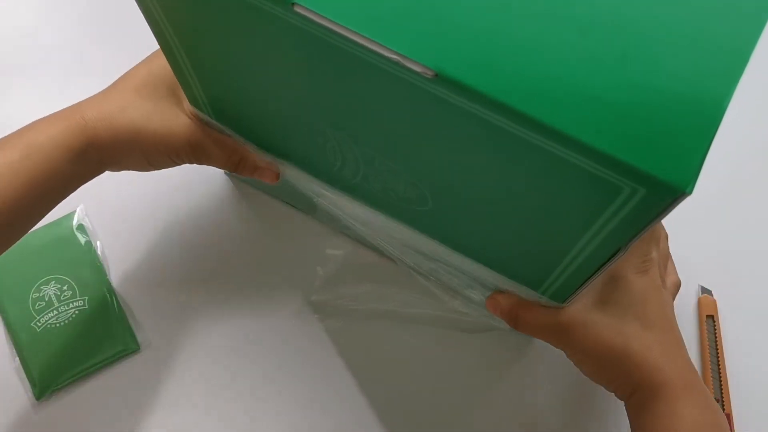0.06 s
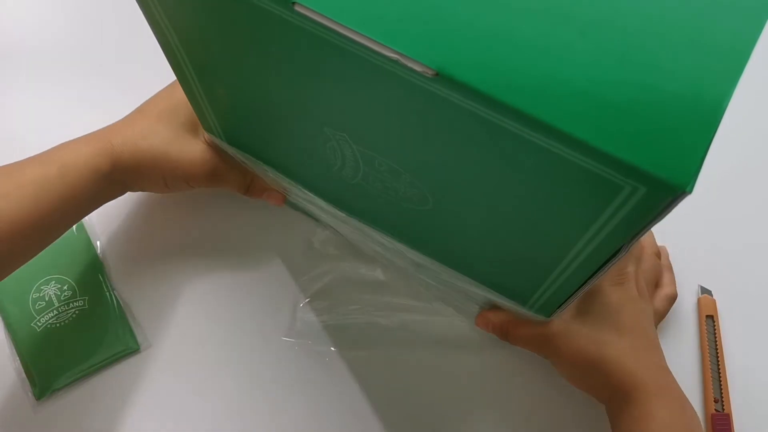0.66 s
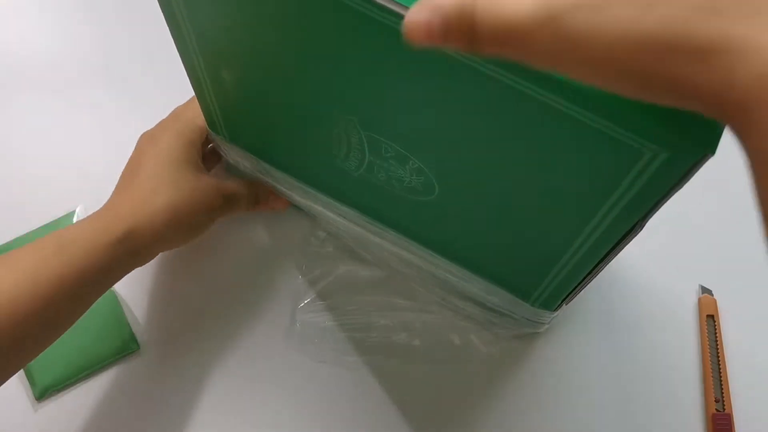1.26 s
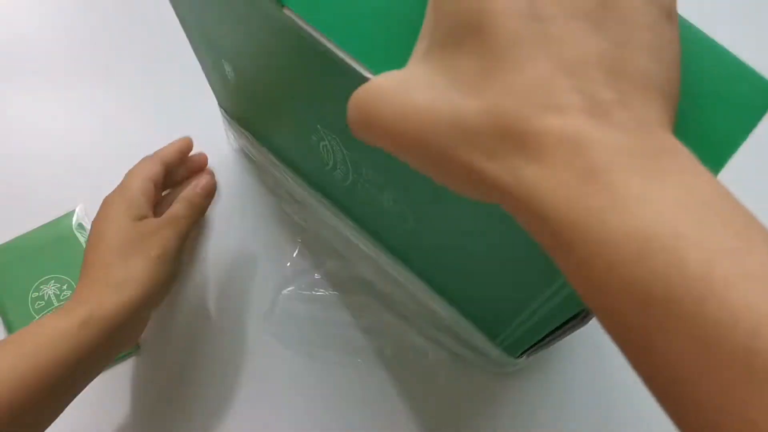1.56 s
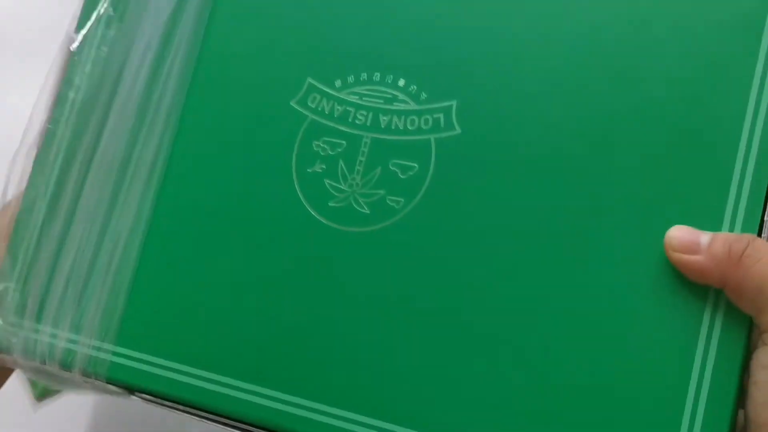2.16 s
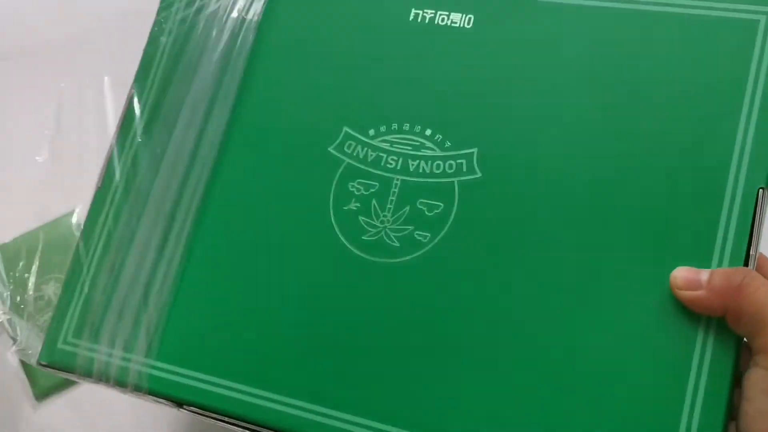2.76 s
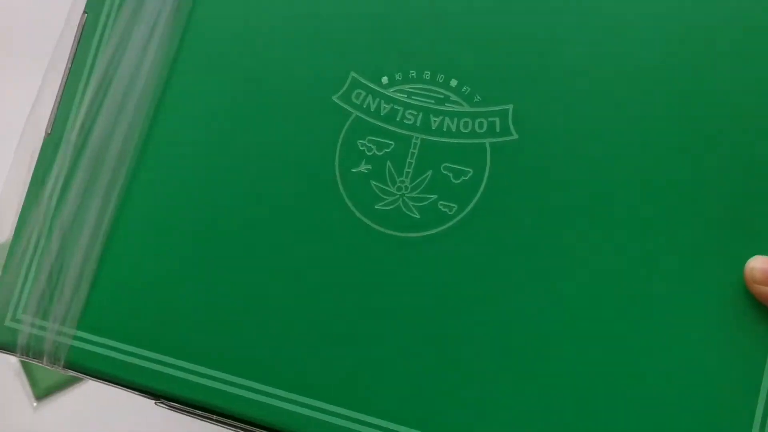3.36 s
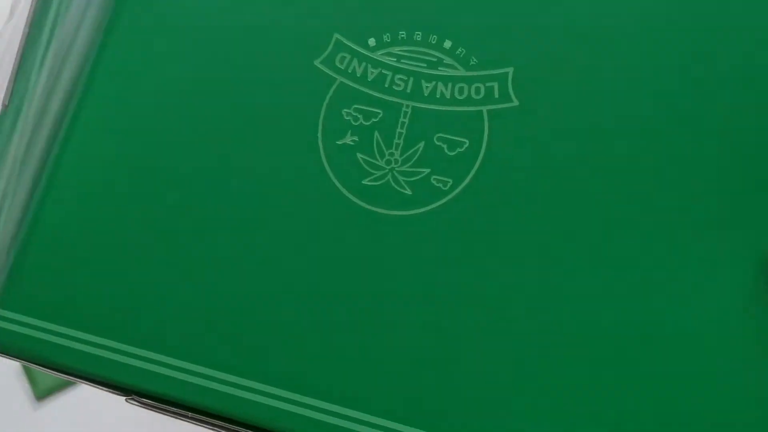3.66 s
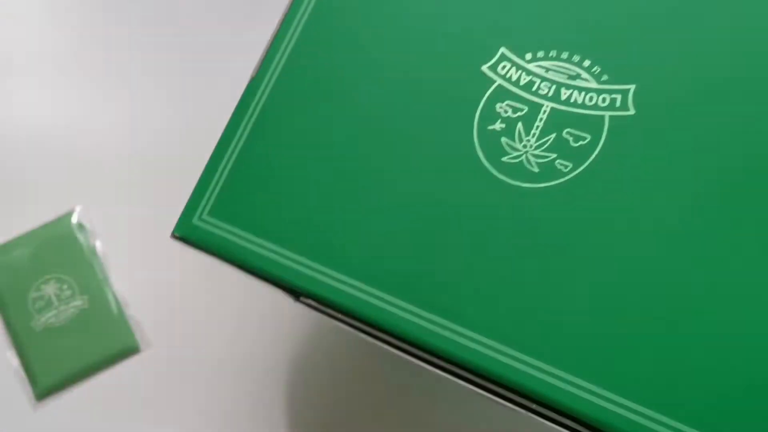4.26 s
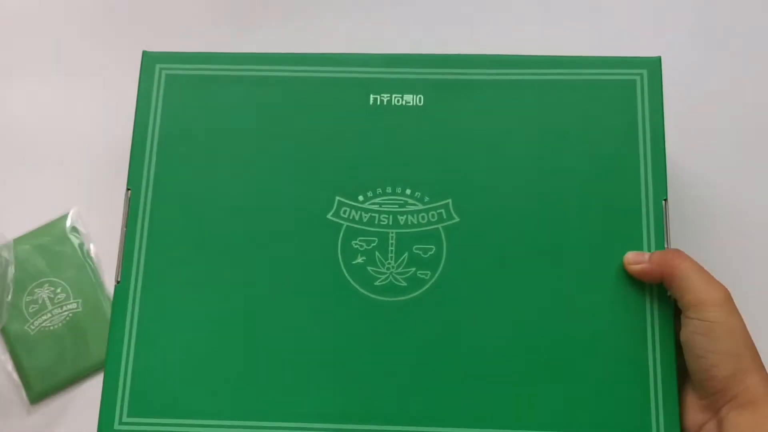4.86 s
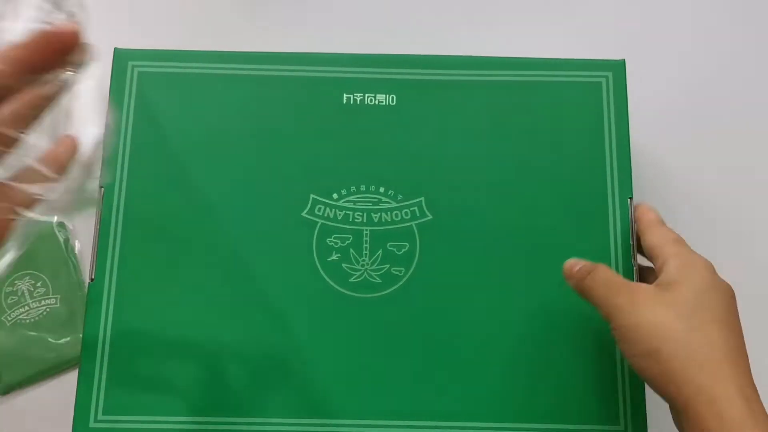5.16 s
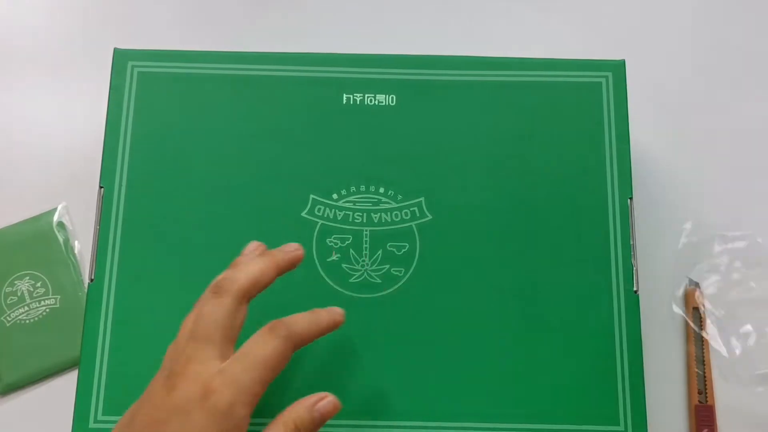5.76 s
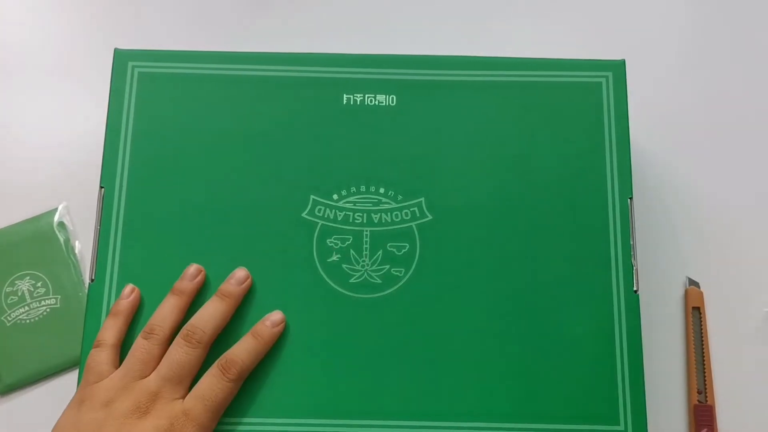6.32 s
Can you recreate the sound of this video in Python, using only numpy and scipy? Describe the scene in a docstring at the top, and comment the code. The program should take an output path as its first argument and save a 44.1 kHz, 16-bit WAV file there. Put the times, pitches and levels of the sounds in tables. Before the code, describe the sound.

Thin plastic wrap hisses softly in uneven strokes as it slides off a large cardboard box, with sharper rustles and tiny snaps when it is tugged. Fingers tap and rub the hollow lid. After one loud tug, the box lands on a table in two low thumps, clacking and scraping, and the loose wrap rustles aside. The sound is close, in a small quiet room with a faint hum.

```python
"""Unwrapping a cardboard box

Close by in a small room, a sleeve of plastic wrap is worked off a large box. The film hisses as it
sticks and slips over the card, rustles when tugged and snaps at its creases. Fingers tap and rub the
hollow lid. The box lands on a table in two thumps, its contents clack, its shell scrapes, and the
loose wrap is swept aside. Still air and a faint hum lie underneath."""
import sys
import numpy as np
from scipy import signal
from scipy.fft import rfft, irfft, next_fast_len
from scipy.io import wavfile
from scipy.ndimage import uniform_filter1d

SR = 44100
rng = np.random.default_rng(int(sys.argv[2]) if len(sys.argv) > 2 else 0)


def transcribe(signal):
    """Save signal, clipped to [-1, 1], as a 16-bit WAV file at the path in sys.argv[1]."""
    frames = np.atleast_2d(signal).T
    limited = np.clip(frames, -1, 1)
    pcm = np.round(limited * 32767).astype(np.int16)
    wavfile.write(sys.argv[1], SR, pcm)


N = 286209
TIME = np.arange(N) / SR
AGE = np.arange(SR // 2) / SR   # seconds since a hit

# strokes of film over card: (fastest moment [s], level [dB], rise [s], fall [s], brightness [dB])
FILM_STROKES = [(0.161, -48, 0.2, 0.13, 3.5), (0.44, -53, 0.13, 0.096, 2), (0.76, -49.5, 0.22, 0.17, 0.5),
                (1.16, -64, 0.17, 0.073, 1.5), (1.61, -48.5, 0.039, 0.03, -2.5),
                (1.808, -54, 0.23, 0.15, -4.5), (2.1, -60, 0.025, .1, -12),
                (2.28, -49.5, 0.04, 0.065, -0.5), (2.6, -49, 0.28, 0.24, -1.5), (3.02, -56, 0.2, 0.27, 0.5),
                (3.35, -46.5, .05, 0.05, -3), (3.68, -49.5, 0.16, 0.3, 1.5), (3.921, -39, 0.078, 0.087, -2),
                (4.19, -49.5, 0.049, .07, -1), (4.35, -58, 0.082, 0.084, -2), (5.02, -51, 0.21, .17, -4.5),
                (5.36, -45.5, 0.21, 0.12, -3.5), (5.54, -45.5, 0.13, 0.18, 0), (5.83, -50, 0.075, 0.13, -1),
                (6.351, -47.5, 0.16, 0.14, -0.5)]
# bursts of rustle: tugs on the film, and duller slaps as the box is hit or set down:
# (peak time [s], level [dB], rise [s], fall [s], tilt [dB/octave])
RUSTLES = [(0.801, -38.5, .0004, 0.0058, -3), (1.197, -35, 0.0022, 0.01, -7.5),
           (2.545, -26.5, .0003, 0.012, -0.5), (2.57, -35, 0.017, 0.034, -6),
           (2.648, -33, 0.043, 0.024, 1.5), (2.743, -31, 0.00048, 0.0075, -2),
           (3.324, -32, 0.00041, 0.017, -2), (3.373, -39, 0.0071, .023, -4),
           (3.593, -33, .0005, 0.034, 2.5), (3.811, -37.5, 0.0011, 0.027, -1.5),
           (3.848, -30.5, 0.0009, 0.025, 1), (3.901, -22, 0.02, 0.021, -2), (4.714, -30, 0.0071, 0.028, -9),
           (4.982, -32, 0.0034, 0.05, -7.5), (5.457, -34, 0.0011, 0.089, -0.5),
           (5.744, -45.5, .002, 0.019, -.5)]
# single creases flipping: (time [s], level [dB], pitch [Hz], pan to the left [dB])
SNAPS = [(0.7705, -44, 7900, -1), (0.8025, -31.5, 8800, 3), (0.87, -21, 10500, 8.5),
         (0.8743, -22.5, 8700, -14.5), (1.3583, -43, 8000, -17), (2.4538, -33.5, 9650, 5),
         (2.7422, -28, 4700, 4), (2.9375, -40.5, 10700, 20), (3.8753, -25, 7770, -15),
         (4.1634, -36.5, 4920, -6), (5.7437, -35.5, 7460, -21)]
# the film's travel, heard in its treble: (time [s], pan to the left [dB])
FILM_PATH = [(0, 0.5), (1.6, 0), (2.25, 6.5), (2.6, 5), (3.6, 2.5), (4.6, 2), (5.55, 1.5), (5.8, -3),
             (6.45, -2)]
# the whole box thumping: (time [s], level [dB], pitch [Hz], ring t60 [s])
THUMPS = [(1.479, -37.5, 123.4, 0.24), (3.896, -22.5, 141, 0.062), (4.7, -21, 82, 0.2),
          (4.711, -11, 129, 0.14), (5.012, -30.5, 130, 0.37), (5.196, -16, 77.3, 0.2),
          (5.204, -17.5, 134, 0.12), (5.226, -15, 85, 0.08), (5.29, -32, 133.4, .35),
          (6.142, -38, 118, 0.25), (6.18, -32, 110.4, 0.094)]
# soft fingertips on the lid: (time [s], level [dB], pitch [Hz])
FINGER_TAPS = [(0.737, -41.5, 267), (1.166, -39.5, 240), (1.643, -35, 236), (1.681, -34.5, 289),
               (1.747, -29.5, 233), (1.77, -29.5, 227), (1.873, -33, 244), (1.939, -26.5, 269),
               (2.085, -38, 278), (2.524, -29, 384), (2.628, -30, 490), (2.702, -38.5, 290),
               (2.935, -44, 530), (3.139, -41.5, 525), (3.323, -25.5, 531), (3.848, -34, 425),
               (3.889, -27, 186)]
# hard hits: (time [s], lid level [dB], lid pitch [Hz], edge level [dB], edge pitch [Hz])
HARD_HITS = [(0.174, -41, 412, -49, 950), (1.196, -33, 293, -36, 2320), (2.5, -32, 233, -54, 1020),
             (2.545, -30, 216, -35, 1950), (2.681, -30, 286, -58, 1000), (2.742, -37.5, 496, -41, 1800),
             (4.083, -33.5, 410, -54, 950), (4.111, -31, 218, -46.5, 945), (4.139, -33.5, 348, -56, 1000),
             (4.511, -39, 202, -56, 950), (4.711, -20.5, 240, -27.5, 2850), (4.979, -37, 244, -35, 1210),
             (5.012, -29.5, 233, -26.5, 1380), (5.197, -22, 314, -30.5, 940),
             (5.2205, -22, 267, -17.5, 1670), (5.288, -24.5, 211, -26.5, 1280),
             (5.315, -27.5, 526, -48, 1150), (5.372, -32.5, 720, -43, 1130), (6.142, -45, 292, -45, 1300),
             (6.188, -43, 186, -48, 1000)]
# the box dragging: (start [s], end [s], level [dB], hardness [dB/octave])
DRAGS = [(1.612, 1.686, -41, -27), (1.745, 1.823, -51, -15), (2.497, 2.717, -47.5, 1.5),
         (3.559, 3.804, -59, 0.5), (4.991, 5.086, -38, -6), (5.283, 5.38, -39.5, 0),
         (5.363, 5.415, -40, 16), (5.401, 5.437, -37, -30)]
# skin rubbing the card: (start [s], firmest moment [s], end [s], level [dB])
RUBS = [(1.965, 2.08, 2.205, -49.5), (6.122, 6.38, 6.4, -51)]

# modes of the lid, and of the stiff edges and contents: (pitch [Hz], level [dB], ring t60 [s])
LID_MODES = [(182, -10, 0.32), (225.3, -3.5, 0.19), (293.5, 0, 0.12), (353.4, -6, 0.19),
             (380.5, -0.5, 0.15), (506.7, -9, 0.11), (634, -2.5, 0.1), (708, 0.5, 0.039), (836, -11, 0.21),
             (1150, -11, 0.048)]
EDGE_MODES = [(945, -9, .06), (1150, -6, .06), (1243, -3, .08), (1302, 0, .08), (1455, -1, .09),
              (1620, -6, .07), (1850, -6, .06), (2094, -7, .05), (2530, -8, .04), (2800, -8, .04),
              (3200, -11, .035), (4300, -12, .03)]
# modes of the dragged shell: (pitch [Hz], bandwidth [Hz], level [dB])
SHELL_MODES = [(218.7, 26.4, -0.5), (310, 164, -5.5), (403, 46, 0), (508, 46, -5), (724, 76, -8),
               (936, 110, -15), (1157, 24, -9.5), (1540, 68, -43)]

# EQ curves of sliding film, rustle bursts, skin, dull card, hard contact and room air:
# (frequency [Hz], level [dB])
FILM_EQ = [(150, -13.5), (450, -0.5), (800, 2.5), (1400, -2), (2500, -2), (4500, 1.5), (6200, -4),
           (8100, 0), (9200, -2), (10700, -1.5), (12500, -8), (15800, -13.5)]
RUSTLE_EQ = [(100, -6.5), (400, 1), (1000, -1), (2000, -1.5), (4400, 2), (6300, -4.5), (8000, 0),
             (9300, -1), (11000, -1), (13000, -9), (15800, -15)]
SKIN_EQ = [(200, 5), (600, 2), (900, -3), (1300, 8.5), (1900, 5), (2600, 0), (3500, -9), (8000, -35)]
CARD_EQ = [(60, 0), (200, -7), (350, -9), (700, -0.5), (1150, -14), (2500, -17), (8000, -71)]
CRACK_EQ = [(300, -14), (900, 6), (1400, 4.5), (2800, -0.5), (5000, -12), (6500, -16), (15000, -32)]
AIR_EQ = [(20, 0), (50, -0.5), (120, -9), (200, -13.5), (500, -19.5), (1000, -30.5), (4000, -29),
          (8000, -37), (15000, -50)]
# the room's decay: (frequency [Hz], t60 [s])
ROOM_T60 = [(100, 0.52), (300, 0.41), (1000, 0.29), (4000, 0.33), (14000, 0.18)]
# how alike diffuse sound is at the two ears: (frequency [Hz], correlation [ratio])
EAR_LIKENESS = [(30, 0.61), (100, 0.5), (300, 0.69), (600, 0.4), (1200, 0), (3000, 0.2), (14000, 0.046)]


def sliding_film(level_db=1, flutter_db=1.28, top_db=2.0):
    """A dense hiss of slips with crinkles on top; taut film gains treble and loses its midrange."""
    stroke_db, bright_db = film_strokes()
    friction = rms_one(slips(per_s=8000, spread_db=0, size=N))
    hiss = rms_one(colour(friction + .5 * crinkles(), FILM_EQ))
    top = treble(hiss)
    body = signal.sosfiltfilt(signal.butter(2, 2300, fs=SR, output="sos"), hiss)
    presence = hiss - body - top
    shaped = body * from_db(-np.clip(bright_db, -4, 6)) + presence + top * from_db(bright_db + top_db)
    makeup = 1 / np.sqrt(.5 + .5 * from_db(bright_db) ** 2)
    return shaped * makeup * from_db(stroke_db + level_db + flutter_db * drift(60))


def film_strokes(resting_db=-67, shape=1.52, waver_db=1.23):
    """Level and brightness of the slide in dB: strokes overlap, and the strongest sets the colour."""
    power, bright = from_db(resting_db) ** 2, 0   # the film is never quite still in the hands
    for s, db, rise, fall, bright_db in FILM_STROKES:
        away = np.maximum((s - TIME) / rise, (TIME - s) / fall)
        stroke = (from_db(db) * np.exp(-away ** shape)) ** 2   # shape 1 is pointed, 2 a round bell
        power += stroke
        bright += stroke * bright_db
    return 10 * np.log10(power) + waver_db * drift(18), bright / power


def crinkles(per_s=100, clump_db=5):
    """Small creases flip in clusters; each size of crease ticks in its own octave."""
    out = 0
    for hz in np.geomspace(2500, 12000, num=6):
        clicks = slips(per_s * from_db(clump_db * drift(20)), spread_db=5, size=N)
        out += bandpass(clicks, hz / np.sqrt(2), hz * np.sqrt(2), order=1)
    return rms_one(out)


def rustles(level_db=-0.5, judder_db=2, lead_s=.1):
    """Bursts of rustle: tugs on the film, and duller slaps as the box is hit or set down."""
    out = np.zeros((2, N))
    from_peak = AGE - lead_s
    for s, db, rise, fall, tilt_db in RUSTLES:
        swell = np.exp(np.minimum(from_peak / rise, -from_peak / fall))
        rush = rms_one(colour(slips(per_s=5000, spread_db=1, size=len(AGE)), RUSTLE_EQ, tilt_db))
        add(out, s - lead_s, from_db(db + level_db) * swell * rush)
    return out * from_db(judder_db * drift(250))


def snaps(level_db=-8, rustle_db=-11):
    """A crease flips over with a tiny, bright tick and a puff of rustle."""
    out = np.zeros((2, N))
    for s, db, hz, pan_db in SNAPS:
        tick = peak_one(ring(hz, t60=0.0021) * attack(0.00011))
        rustle = from_db(rustle_db) * burst(FILM_EQ, t60=0.0036)
        add(out, s, from_db(db + level_db) * pan(pan_db) * (tick + rustle))
    return out


def follow_film(film, body_pan_db=-1.5, top_pan_db=0.5):
    """The short waves are shadowed most, so the treble follows the film from side to side."""
    top = treble(film)
    path_db = np.interp(TIME, *np.transpose(FILM_PATH))
    return (film - top) * pan(body_pan_db) + top * pan(path_db + top_pan_db)


def lid_reflection(film, delay_s=0.000603, sway=0.396, echo=0.47):
    """The lid reflects the moving film; the changing gap shifts the colour at each ear."""
    lags = delay_s * SR * np.exp(sway * np.array([drift(8.1), drift(9)]))
    samples = np.arange(N)
    bounce = np.array([np.interp(samples - lag, samples, side) for lag, side in zip(lags, film)])
    return (film + echo * bounce) / np.sqrt(1 + echo ** 2)


def thumps(thud_db=-11):
    """The mass of the box bounces on the table top, or its broad face flexes."""
    out = np.zeros((2, N))
    for s, db, hz, t60 in THUMPS:
        boom = ring(hz, t60) * attack(0.0021)
        thud = burst([(25, 14), (80, 8), (250, 5), (600, -6), (2000, -77)], t60=0.16)
        add(out, s, from_db(db) * (from_db(thud_db) * thud - boom))
    return out * pan(-0.76)


def knocks(level_db=-1.5, dull_db=-4, tap_modes_db=-8, hit_modes_db=1.5):
    """The hollow lid is knocked: spot and grip set its note, and hard hits bring out its other modes."""
    out = np.zeros((2, N))
    for rows, modes_db in (FINGER_TAPS, tap_modes_db), (HARD_HITS, hit_modes_db):
        for s, db, hz, *_ in rows:
            modes = struck(LID_MODES, hz, focus_db=7.5, vary_db=1.5, detune=0.031)
            dull = from_db(dull_db) * burst(CARD_EQ, t60=0.12)
            knock = ring(hz, t60=0.071) + from_db(modes_db) * (modes + dull)
            add(out, s, from_db(db + level_db) * peak_one(knock * attack(0.00077)))
    return out


def clacks(level_db=-4, rebound_s=.007, rebound_loss_db=11):
    """A hard edge hits and bounces once, each time with a crack and the short ring of stiff card."""
    out = np.zeros((2, N))
    for s, _, _, db, hz in HARD_HITS:
        for late_s, loss_db in (0, 0), (rebound_s, rebound_loss_db):
            edge = struck(EDGE_MODES, hz, focus_db=12, vary_db=2, detune=.01)
            crack = burst(CRACK_EQ, t60=0.081)
            add(out, s + late_s, from_db(db + level_db - loss_db) * (edge + crack))
    return out * pan(-1.7)


def drags(fade_s=0.0087):
    """Card sticks and slips as it is dragged, which keeps the shell ringing."""
    out = np.zeros((2, N))
    lowest_hz = SHELL_MODES[0][0]
    for start, end, db, hardness in DRAGS:
        stroke = np.clip(np.minimum(AGE, end - start - AGE) / fade_s, 0, 1)
        force = stroke * slips(per_s=500, spread_db=3, size=len(AGE))[0] + 1e-18
        shell = 0
        for k, (hz, width, mode_db) in enumerate(SHELL_MODES):
            radius = np.exp(-np.pi * width / SR)
            poles = [1, -2 * radius * np.cos(2 * np.pi * hz / SR), radius ** 2]
            gain = (-1) ** k * from_db(mode_db + hardness * np.log2(hz / lowest_hz))
            shell += gain * signal.lfilter([1 - radius, 0, radius - 1], poles, force)
        makeup = np.sqrt(stroke.sum() / (np.sum(shell ** 2) + 1e-20))
        add(out, start, from_db(db) * makeup * shell)
    return out


def rubs(judder_db=1.5, fade_s=0.024, light_db=-5):
    """Skin drags over the lid with a soft midrange rasp that grows as the hand presses harder."""
    pressure = 0
    for start, firmest, end, db in RUBS:
        press_db = np.interp(TIME, [start, firmest, end], [light_db, 0, light_db])
        fade = np.clip(np.minimum(TIME - start, end - TIME) / fade_s, 0, 1)
        pressure += from_db(db + press_db) * fade
    judder = from_db(judder_db * drift(90))
    rasp = rms_one(colour(slips(per_s=1900, spread_db=0.5, size=N), SKIN_EQ))
    return pressure * judder * rasp


def room(x, wet_db, early_db, early_t60):
    """Direct sound, a quick scatter from table and box, and a tail that dies sooner in the treble."""
    noise = stereo_noise(len(AGE))
    edges = np.geomspace(50, 18000, num=9)
    tail = sum(bandpass(noise, low, high, order=2) * decay(at_hz(ROOM_T60, np.sqrt(low * high)))
               for low, high in zip(edges, edges[1:]))
    early = stereo_noise(len(AGE)) * decay(early_t60) * (AGE > .001)
    response = from_db(wet_db) * rms_one(tail * (AGE > .008)) + from_db(early_db) * rms_one(early)
    return x + signal.fftconvolve(x, response / np.sqrt(len(AGE)), axes=1)[:, :N]


def room_tone(air_db=-58, hum_db=-63.5, hum_hz=121.8):
    """A dark bed of still air with a faint hum."""
    air = from_db(air_db) * rms_one(colour(stereo_noise(N), AIR_EQ))
    return air + from_db(hum_db) * np.sin(2 * np.pi * hum_hz * TIME)


def slips(per_s, spread_db, size):
    """Tiny stick-slip clicks, each reaching the ears from its own spot on the surface."""
    born = rng.random(size) < per_s / SR
    signs = rng.choice([-1, 1], size)
    left = born * signs * from_db(spread_db * np.minimum(rng.exponential(1, size), 4))
    lag = np.rint(rng.normal(5, 9, size)).astype(int)   # samples between the ears
    right = np.bincount(np.clip(np.arange(size) + lag, 0, size - 1), left, size)
    return np.array([left, right])


def struck(modes, main_hz, focus_db, vary_db, detune):
    """Modes ring from one hit; the spot favours those near main_hz and the grip detunes them a little."""
    hz, db, t60 = np.transpose(modes)[:, :, None]
    strength, shift, sign = rng.standard_normal((3, len(modes), 1))
    octaves_away = np.abs(np.log2(hz / main_hz))
    gain = from_db(db + vary_db * strength - focus_db * octaves_away) * np.sign(sign)
    return peak_one(np.sum(gain * ring(hz * (1 + detune * shift), t60), axis=0))


def burst(eq, t60):
    """The crowd of heavily damped modes at the start of a hit, as decaying noise."""
    return peak_one(colour(stereo_noise(len(AGE)) * decay(t60), eq))


def ring(hz, t60):
    """One damped mode."""
    return np.sin(2 * np.pi * hz * AGE) * decay(t60)


def attack(rise_s):
    """An envelope that eases in from silence."""
    return 1 - np.exp(-AGE / rise_s)


def decay(t60):
    """An envelope that falls 60 dB in t60 seconds."""
    return from_db(-60 * AGE / t60)


def stereo_noise(size):
    """Diffuse white noise: fairly alike at both ears in the bass, wide in the treble."""
    mid, side = rfft(rng.standard_normal((2, size)))
    alike = at_hz(EAR_LIKENESS, np.arange(len(mid)) * SR / size)
    return irfft(np.sqrt(1 + alike) * mid + np.sqrt(1 - alike) * side * [[1], [-1]], size)


def drift(per_s):
    """Smooth random wandering with an rms of 1."""
    knots = rng.standard_normal(4000)
    return rms_one(np.interp(TIME * per_s, np.arange(len(knots)), knots))


def colour(x, eq, tilt_db=0):
    """Minimum-phase EQ, with the treble tilted by tilt_db per octave."""
    n = 2 * next_fast_len(x.shape[-1] // 2 + 2048)
    hz = np.arange(n // 2 + 1) * SR / n
    gain = from_db(at_hz(eq, hz) + tilt_db * np.log2(1 + hz / 1500))
    cepstrum = irfft(np.log(gain))
    cepstrum[1:n // 2] *= 2   # folded forward, so nothing rings ahead of a click
    cepstrum[n // 2 + 1:] = 0
    return irfft(rfft(x, n) * np.exp(rfft(cepstrum)))[..., :x.shape[-1]]


def treble(x):
    """The part of a sound above 6.2 kHz."""
    return signal.sosfiltfilt(signal.butter(3, 6200, "high", fs=SR, output="sos"), x)


def bandpass(x, low_hz, high_hz, order):
    """One band of a sound."""
    return signal.sosfilt(signal.butter(order, [low_hz, high_hz], "band", fs=SR, output="sos"), x)


def at_hz(curve, hz):
    """Read a curve on a log-frequency axis."""
    knots_hz, values = np.transpose(curve)
    return np.interp(np.log(np.maximum(hz, 1)), np.log(knots_hz), values)


def from_db(db):
    """Decibels to gain."""
    return 10 ** (np.asarray(db) / 20)


def rms_one(x):
    """Scale to an rms of 1."""
    return x / np.sqrt(np.mean(x ** 2) + 1e-20)


def peak_one(x):
    """Scale so that the loudest two milliseconds have an rms of 1."""
    return x / np.sqrt(uniform_filter1d(x ** 2, size=88).max() + 1e-20)


def pan(db):
    """Left and right gains; positive dB leans left."""
    return from_db(np.array([[.5], [-.5]]) * db)


def add(out, s, sound):
    """Mix a sound in at s seconds."""
    i = max(round(s * SR), 0)
    out[..., i:i + sound.shape[-1]] += sound[..., :N - i]


def scene():
    """Film and box, each layer with its own reverb send, over the room tone."""
    moving_film = lid_reflection(follow_film(sliding_film() + rustles()))
    film = room(moving_film, wet_db=-16, early_db=-13.5, early_t60=.03)
    touches = room(snaps() + rubs(), wet_db=-8, early_db=-9.5, early_t60=0.047)
    box = room(knocks() + drags(), wet_db=-14, early_db=-15.5, early_t60=0.041)
    edges = room(clacks(), wet_db=-7, early_db=-11, early_t60=0.048)
    table = room(thumps(), wet_db=-23, early_db=-29, early_t60=0.068)
    return film + touches + box + edges + table + room_tone()


def record(dry):
    """A steep high cut at 15.9 kHz."""
    return signal.sosfilt(signal.ellip(10, .3, 80, 15900, fs=SR, output="sos"), dry)


dry = scene()
out = record(dry)
transcribe(out)
```